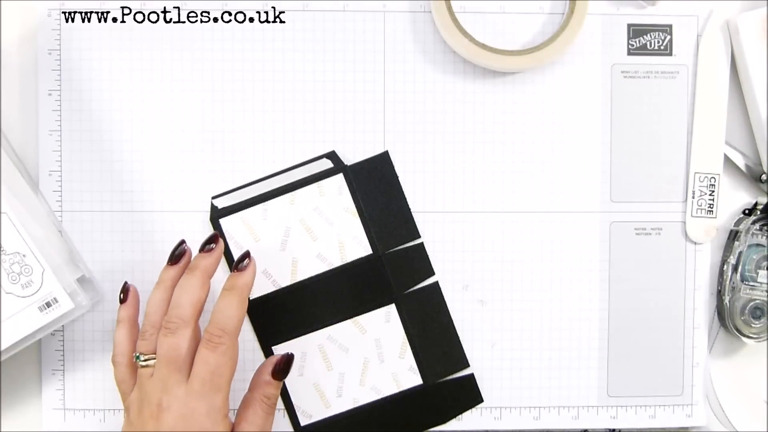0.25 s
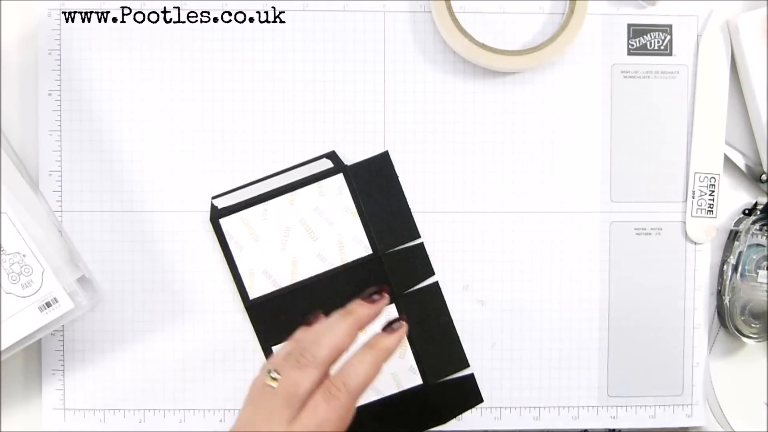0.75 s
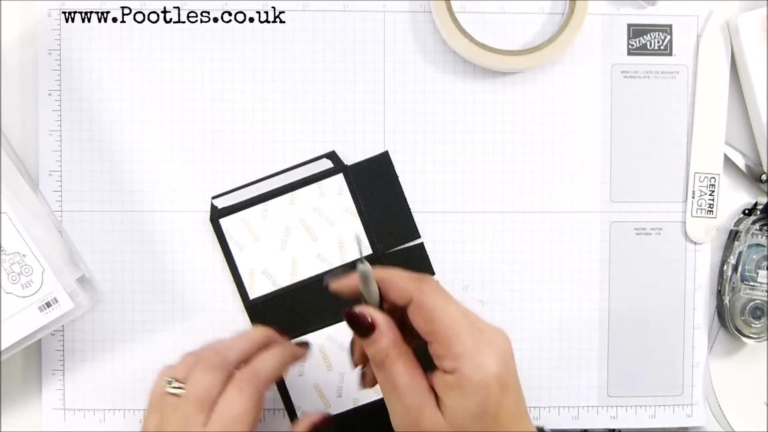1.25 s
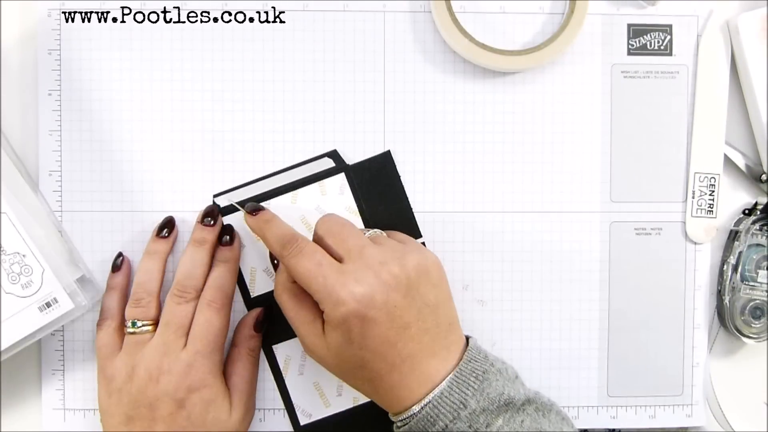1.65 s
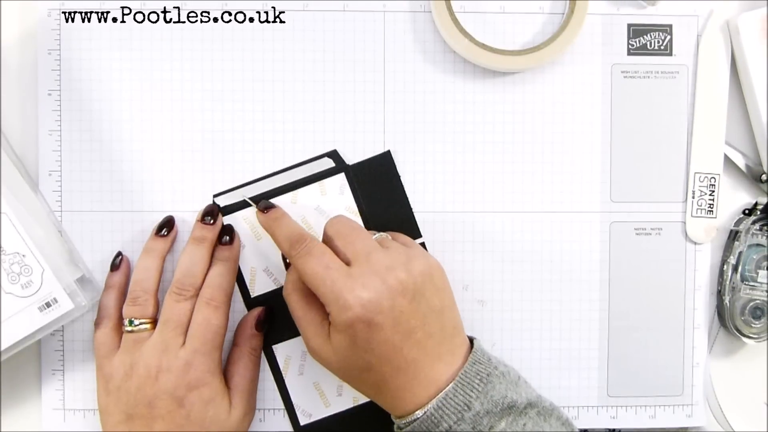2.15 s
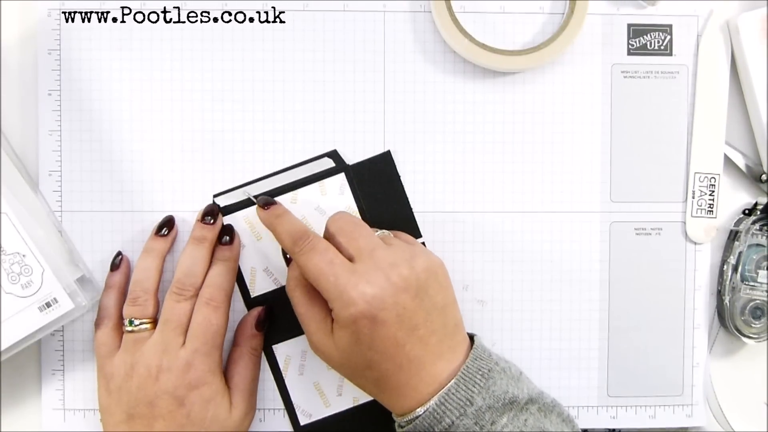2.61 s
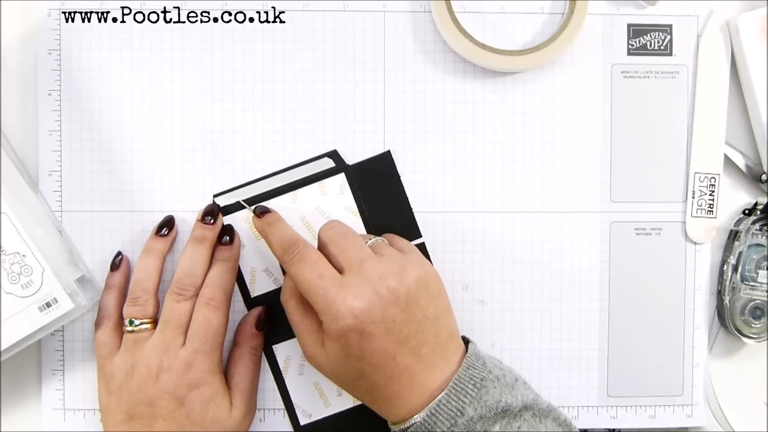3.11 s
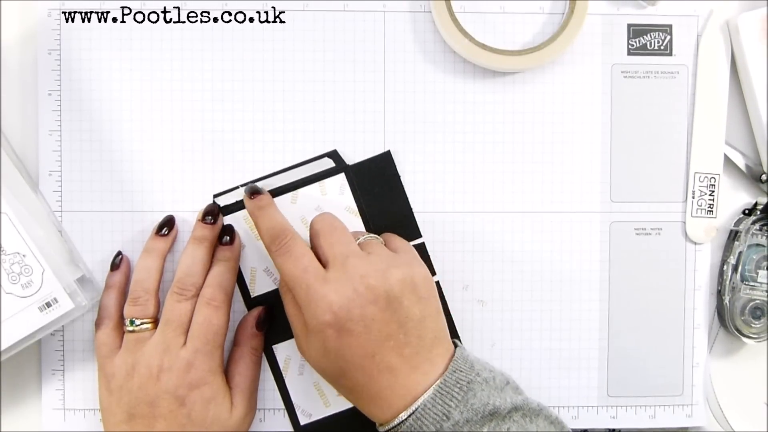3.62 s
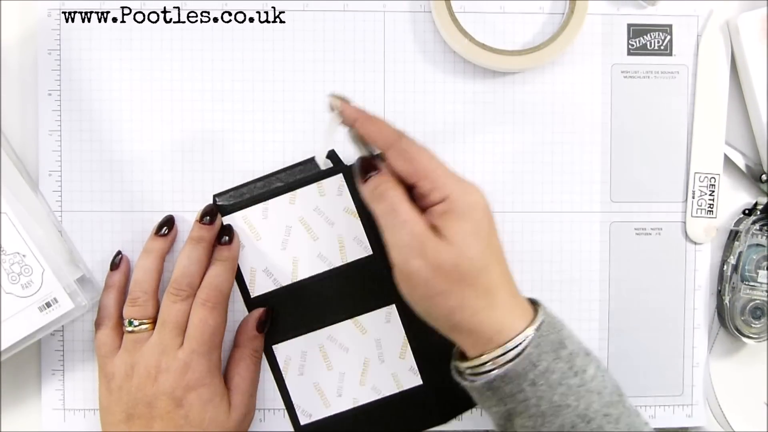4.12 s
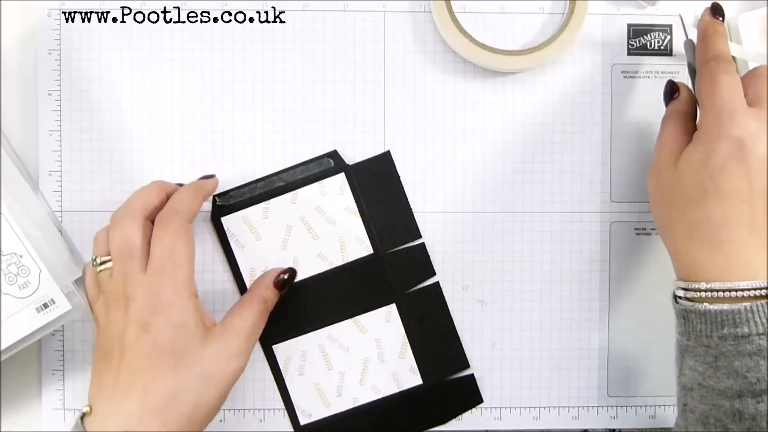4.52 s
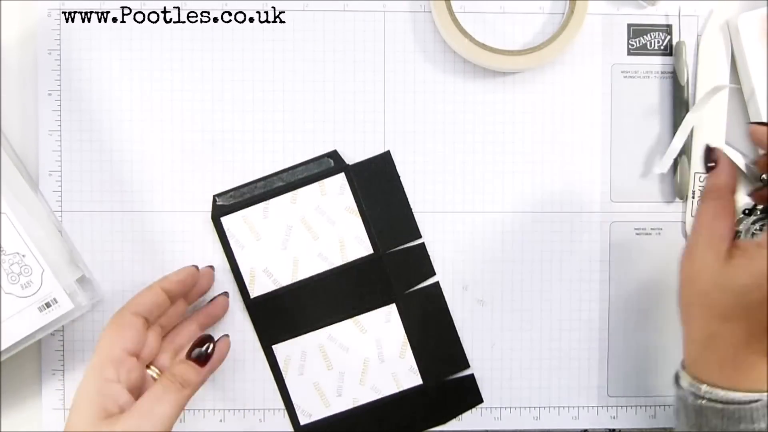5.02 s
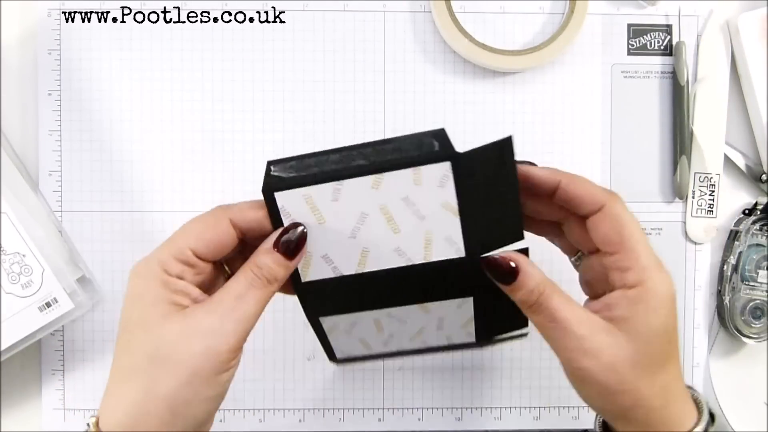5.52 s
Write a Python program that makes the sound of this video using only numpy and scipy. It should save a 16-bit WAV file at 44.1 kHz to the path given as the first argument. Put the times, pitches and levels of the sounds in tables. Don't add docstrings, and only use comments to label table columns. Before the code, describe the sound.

A close stereo microphone hears a craft table in a small, quiet room with soft noise and a very faint steady whine. From 0 to 0.7 s a hollow plastic dispenser knocks, scrapes and shoves about, slightly right; papery hisses whisk by near 0.3 s, knocks gather at 0.37 s, and the loudest clack lands at 0.55 s, with chatter rocking out by about 1 s. From 1 to 3.4 s it is nearly silent: faint fingertip rubs, soft low touches and tiny ticks of a point picking at card, clearest near 2.6 and 3 s. At 3.45 s a thin hiss falls in pitch, then a strip peels in small dry snaps, brightest at 4.15 s. A slim tool drops with a woody clunk at 4.66 s, bounces and rolls briefly. From 5.15 s stiff card slides, with crisp ticks and cracks at 5.3 to 5.45 s, then is lifted, with a last scuff at the end.

```python
import sys
import numpy as np
from scipy import signal
from scipy.io import wavfile

SR = 44100
rng = np.random.default_rng(int(sys.argv[2]) if len(sys.argv) > 2 else 0)


def wrap_up_sound(samples):
    columns = np.atleast_2d(samples).T
    tamed = np.clip(columns, -1, 1)
    steps = np.round(tamed * 32767).astype(np.int16)
    wavfile.write(sys.argv[1], SR, steps)


def gain_from_db(level_db):
    decades = np.asarray(level_db, float) / 20
    return 10 ** decades


N = 253575


def rms_one(x):
    return x / np.sqrt(np.mean(x ** 2) + 1e-20)


def at_hz(points, hz):
    point_hz, level_db = np.array(points).T
    return np.interp(np.log(hz), np.log(point_hz), level_db)


def drift(rate_hz):
    step = 40
    pole = np.exp(-2 * np.pi * rate_hz * step / SR)
    noise = rng.standard_normal(N // step + 2002)
    slow = signal.lfilter([1], [1, -2 * pole, pole * pole], noise)[2000:]
    return np.interp(np.arange(N) / step, np.arange(len(slow)), rms_one(slow))


# frequency in Hz, side minus mid in dB.
NEAR_WIDTH = [(60, -25), (125, -23), (250, -21), (500, -16), (1000, -10), (2000, -6), (4000, -3.5),
              (8000, -.5), (12000, 1)]


def spread(mid, side, hz, width=NEAR_WIDTH):
    side = side * gain_from_db(at_hz(width, hz))
    return np.array([mid + side, mid - side])


def ring(force, hz, t60):
    radius = gain_from_db(-60 / (t60 * SR))
    angle = 2 * np.pi * hz / SR
    zeros = np.sqrt((1 - radius ** 2) / 2) * np.array([1, 0, -1])
    poles = [1, -2 * radius * np.cos(angle), radius ** 2]
    return signal.lfilter(zeros, poles, force + 1e-18)


def blows(rows, chatter_s):
    return [(*row, chatter_s) for row in rows]


def strokes(rows, rise):
    curves = []
    for s, length, db, bright in rows:
        peak_s = s + np.clip(rise, .05, .95) * length
        curves.append([(s, db - 13.5, bright), (peak_s, db, bright), (s + length, db - 22.5, bright)])
    return curves


BRIGHTNESS_TILT = (-2.5, -0.6, 2, 2.5)


def registers(curves, colour_db):
    tilt, colour = np.array(BRIGHTNESS_TILT), np.array(colour_db)
    return [[(s, *(db + colour + bright * tilt)) for s, db, bright in rows] for rows in curves]


def friction(curves, per_s, uneven_db, clump_db):
    grains = (rng.random((2, N)) < per_s / SR) * rng.choice([-1, 1], (2, N))
    grain_size = np.minimum(rng.exponential(1, (2, N)), 4)
    grains = rms_one(grains * gain_from_db(uneven_db * grain_size))
    levels = np.zeros((4, N))
    for rows in curves:
        s, *columns = np.transpose(rows)
        during = np.arange(round(s[0] * SR), min(N, round(s[-1] * SR)))
        levels[:, during] += [gain_from_db(np.interp(during / SR, s, column)) for column in columns]
    together = drift(60)
    clumps = [gain_from_db(clump_db * (.6 * together + .8 * drift(30))) for _ in levels]
    return grains, levels * clumps


REGISTER_EDGES = [200, 1100, 3500]


def struck(modes, hits, curves, boost_db, focus_db, thump_db, tick_db, per_s, uneven_db, clump_db, pan_db):
    grains, levels = friction(curves, per_s, uneven_db, clump_db)
    out, force, modes = np.zeros((2, N)), np.zeros((2, N)), np.array(modes)
    when, peak_db, favoured_hz, body_db, edge_db, chatter_s = np.transpose(hits)
    register = np.searchsorted(REGISTER_EDGES, modes[:, 0])
    after = np.arange(SR // 16) / SR
    span = slice(max(0, round((when.min() - .3) * SR)), round((when.max() + .6) * SR))
    luck_db = rng.standard_normal((len(when), len(modes)))
    chatter = rng.standard_normal((len(when), 2, len(after)))
    chatter *= np.exp(-after / np.clip(chatter_s, 5e-4, .03)[:, None, None])
    for k, (hz, level_db, t60) in enumerate(modes):
        force[:] = 0
        bright = np.clip(np.log(hz / 800) / np.log(4000 / 800), 0, 1)
        register_db = boost_db if register[k] else thump_db
        broad = gain_from_db(body_db + bright * (edge_db - body_db) + register_db)
        near = gain_from_db(peak_db + focus_db - 60 * np.log2(hz / favoured_hz) ** 2)
        blow = np.hypot(broad, near) * np.sqrt(1 + t60 / 0.0087)
        blow *= gain_from_db(luck_db[:, k])
        rattle = np.clip(hz / 2500, .3, 1)
        chatter[:, :, 0] = gain_from_db(tick_db) * np.array([1, .6]) / rattle ** 0.96
        heard = np.sum(ring(chatter[:, 0], hz, t60) ** 2, axis=1) / np.sum(ring(after == 0, hz, t60) ** 2)
        blow *= np.clip(np.sum(chatter[:, 0] ** 2, axis=1) / heard, .1, 10) ** .4
        for s, gain, shape in zip(when, blow, chatter):
            start = round(s * SR)
            force[:, start:start + len(after)] += rattle * gain * shape[:, :N - start]
        same_register = modes[register == register[k], 1]
        share = gain_from_db(level_db) / np.sqrt(np.sum(gain_from_db(2 * same_register)))
        lean_db = pan_db * min(hz / 1200, 1) / 2
        rubbed = ring(grains[:, span] * levels[register[k], span], hz, .45 * t60)
        mid, side = ring(force[:, span], hz, t60) + rubbed
        out[:, span] += (-1) ** k * share * spread(mid, side, hz) * gain_from_db([[lean_db], [-lean_db]])
    return out


# start in seconds, struck spot in
# dB, favoured pitch in Hz, body in dB, edge in dB.
DISPENSER_KNOCKS = [(0.001, -10.5, 361, -42, -37.5), (0.012, -13.5, 326, -67, -41),
                    (0.078, -22, 720, -50, -51), (0.1575, -22, 2480, -42.5, -55),
                    (0.168, -25.5, 1380, -57.5, -59), (0.2095, -28, 2500, -46, -43),
                    (0.214, -21, 800, -51, -64), (0.199, -33, 2410, -45.5, -38.5),
                    (0.243, -29.5, 2200, -55, -57.5), (0.2495, -24.5, 2200, -55, -56.5),
                    (0.262, -32, 2300, -55.5, -58), (0.22, -15, 291.4, -42.5, -71),
                    (0.368, -10.5, 1800, -26.5, -35), (0.371, -9.5, 746, -28, -36.5),
                    (0.376, -19.5, 1000, -38, -43), (0.380, -18.5, 2400, -45, -43),
                    (0.416, -12, 780, -29, -43), (0.423, -18.5, 750, -35, -48),
                    (0.443, -11, 700.5, -42, -62), (0.5452, -1.5, 450, -19, -31),
                    (0.549, -7.5, 1805, -42, -28), (0.551, 0, 680, -38, -34.5),
                    (0.556, -7, 440, -30.5, -33.5), (0.566, -12.5, 600, -37.5, -43.5),
                    (0.579, -14.5, 709, -35, -53), (0.611, -11.5, 487, -60, -54),
                    (0.637, -12.5, 1395, -56, -34.5), (0.6192, -13.5, 1785, -69.5, -37),
                    (0.6242, -33.5, 2196, -33, -37.5), (0.640, -12, 5400, -40, -30.5),
                    (0.6445, -17.5, 1484, -38, -41.5), (0.655, -22, 1505, -34, -42.5),
                    (0.662, -17.5, 664, -24.5, -39), (0.672, -20, 1000, -36, -47),
                    (0.683, -14.5, 800, -54.5, -45),
                    (0.703, -17.5, 1472, -45, -46.5), (0.723, -42, 2210, -64, -46),
                   (0.742, -22, 798, -51, -66), (0.773, -41, 2150, -51, -55), (0.761, -42, 5400, -47, -64),
                   (0.79, -43, 5350, -67, -58), (0.841, -45, 2120, -53, -67), (0.87, -43, 2200, -41, -62),
                   (1.007, -37, 1200, -54.5, -76), (1.036, -27, 330, -52.5, -68.5)]
# start in seconds, struck spot in dB, favoured pitch in Hz,
# body in dB, edge in dB.
EDGE_CRACKS = [(0.150, -8.5, 2403, -35.5, -34), (0.203, -14, 2420, -37.5, -29.5),
               (0.4135, -15, 1846, -32.5, -37), (0.426, -13.5, 2010, -33, -27),
               (0.5458, 9.5, 620, -13.5, -29), (0.609, -18, 3000, -38, -38),
               (0.6345, -22.5, 4100, -34.5, -22), (0.71, -17.5, 2050, -35, -41)]
# time in seconds, pressure in dB,
# speed as brightness in dB per register.
DISPENSER_DRAG = [
    [(0.0, -46.5, -10.5), (.032, -51.5, 3), (.07, -49, 3), (.12, -52.5, 1), (.148, -55, 1.5), (.16, -46, 2),
     (.224, -45.5, 0.5), (.276, -53.5, 6.5), (.334, -59, 2.5), (.362, -70.5, -3)],
    [(.375, -41, -1), (.408, -39, 3.5), (.447, -35, 1.5), (.505, -46.5, 2), (.512, -45, 3), (.54, -48, 6)],
    [(.555, -28, 1.5), (.581, -35, 1.5), (.635, -31, 3), (.699, -37, 1), (.78, -49.5, -2), (.881, -60, -10),
     (.993, -85, -7), (1.041, -61.5, -7), (1.15, -102, 10)],
]
# frequency in Hz, level in dB, 60 dB decay in seconds.
DISPENSER_MODES = [(84, -7.5, 0.54), (154.7, -1.5, 0.14), (288.3, -1, 0.06), (405.5, 2.5, 0.033),
                   (510, 0, 0.04), (702, 0.5, 0.041), (857, 2, 0.03), (1012, 4, 0.018), (1070, -5, 0.012),
                   (1225, -6, 0.048), (1380, -3.5, 0.07), (1499, 5.5, 0.0073), (1610, -2.5, 0.062),
                   (1785, -5, 0.053), (2030, -3, 0.012), (2200, -4, 0.049), (2430, 1, 0.018),
                   (2590, 0, 0.013), (3230, 3, 0.0055), (4040, 9, 0.0023), (4900, 6, 0.006),
                   (4910, 6.5, 0.0074), (5830, 5, 0.0019), (6940, 2, 0.0011), (10330, 4, 0.00056),
                   (13000, -1, 0.00063)]


def dispenser():
    hits = blows(DISPENSER_KNOCKS, chatter_s=.005) + blows(EDGE_CRACKS, chatter_s=.0008)
    dragging = registers(DISPENSER_DRAG, colour_db=(-15, 5, -3, -7))
    return struck(DISPENSER_MODES, hits, dragging, boost_db=5.0, focus_db=-7.0, thump_db=-16.0, tick_db=9.5,
                  per_s=2000, uneven_db=2.0, clump_db=3.5, pan_db=-4.0)


# frequency in Hz, density in dB per Hz.
HUSH_SPECTRUM = [(15, -40), (25, -18), (92, -2.5), (229, -11), (405, -7.5), (607, -13.5), (796, -9.5),
                 (1610, -17.5), (4140, -20.5), (4870, -20), (12200, -25), (14400, -30.5), (16000, -30.5)]
# frequency in Hz, side minus mid in dB.
DIFFUSE_WIDTH = [(60, -8), (110, -29), (200, -4), (380, -6.5), (700, -1), (1290, 3.5), (2380, 3), (4400, 2),
                 (8120, 0.5), (15000, -0.5)]
# frequency in Hz, level in dB.
WHINE_TONES = [(1163, -83.5), (2326, -90)]
# time in seconds, level in dB.
WHINE_LEVEL = [(0, -1.5), (1.75, 7.5), (3.88, 16), (3.95, -6.5), (5.55, -29), (5.62, 10.5)]


def hush(patchy_db):
    out, edges = 0, 25 * 2 ** np.arange(0, 9.6, .5)
    white = rng.standard_normal((2, 2, N))
    for k, (low, high) in enumerate(zip(edges, edges[1:])):
        band_filter = signal.butter(2, [low, high], "band", fs=SR, output="sos")
        mid, side = signal.sosfilt(band_filter, white[k % 2])
        hz = np.sqrt(low * high)
        level_db = at_hz(HUSH_SPECTRUM, hz) + patchy_db * min(1, 300 / hz) * drift(8.6)
        out = out + gain_from_db(level_db) * spread(mid, side, hz, DIFFUSE_WIDTH)
    time = np.arange(N) / SR
    running_db = np.interp(time, *np.transpose(WHINE_LEVEL)) + 2.0 * drift(3.0)
    waver = 1.3 * drift(4.9)
    whine = 0
    for hz, level_db in WHINE_TONES:
        tone = np.sin(2 * np.pi * hz * time + waver * hz / WHINE_TONES[0][0])
        whine = whine + gain_from_db(level_db + running_db) * tone * [[1.6], [-.3]]
    return gain_from_db(-60.5) * rms_one(out) + whine


# time in seconds, peak level in dB.
HAND_LEANS = [(0.006, -36.5), (.91, -58), (1.051, -55), (1.187, -61), (1.482, -54), (1.67, -61.5),
              (2.169, -57), (3.817, -49.5), (4.63, -70), (5.209, -51.5), (5.62, -72), (5.719, -64)]


def leans():
    force, push = np.zeros(N), np.hanning(round(0.015 * SR))
    boom = ring(np.pad(push, (0, SR // 4)), hz=81.4, t60=0.096)
    for s, db in HAND_LEANS:
        force[round(s * SR)] = gain_from_db(db)
    return signal.fftconvolve(force, boom / np.abs(boom).max())[:N]


def sliding_hiss(rows, sharpness):
    s, level_db, hz = np.transpose(rows)
    out, window = np.zeros((2, N)), np.hanning(512)
    for i in range(round(s[0] * SR), round(s[-1] * SR), 256):
        centre = np.interp(i / SR, s, hz)
        t60 = sharpness / centre
        noise = rng.standard_normal((2, len(window)))
        hiss = rms_one(ring(ring(noise, centre, t60), centre, t60))
        gain = gain_from_db(np.interp(i / SR, s, level_db))
        out[:, i:i + len(window)] += gain * window * spread(*hiss, centre)
    return out


# time in seconds, level in dB, centre in Hz.
EDGE_WHISKS = [
    [(.24, -54, 8400), (.27, -53, 8060), (.31, -60, 6850), (.345, -67, 4800)],
    [(.25, -55, 11960), (.3, -53, 11900), (.335, -56, 11000)],
    [(5.2, -56, 4800), (5.235, -60, 4770), (5.26, -64, 4900)],
    [(5.39, -56, 4630), (5.41, -58, 4430), (5.44, -59, 4700)],
    [(3.64, -65, 169), (3.67, -67.5, 200), (3.72, -59, 257), (3.77, -65, 300)],
    [(5.24, -56, 2100), (5.27, -64, 2100), (5.3, -47, 2100)],
    [(.25, -57, 298), (.3, -57, 300), (.335, -65, 295)],
    [(.718, -38.5, 2200), (.738, -64, 2200)],
    [(.162, -39, 1380), (.2, -49, 1320)],
    [(.632, -34, 1550), (.668, -38, 1520)],
    [(.47, -48, 1450), (.505, -40.5, 1450)],
    [(2.268, -64, 2050), (2.295, -60, 1960), (2.32, -79, 1990)],
    [(3.84, -52, 12800), (3.905, -62, 12800), (3.93, -69, 12800), (4.04, -64.5, 13000), (4.15, -63, 12840)],
    [(.838, -54.5, 2210), (.855, -68, 2170), (.872, -59, 2200), (.905, -64, 2200)],
    [(.77, -45, 2200), (.8, -63, 2260)],
]
WHISK_CYCLES = (8, 2.5, 15, 16, 6.1, 17, 9.2, 24, 20, 29, 19, 14, 2.0, 35, 12)


def whisks():
    return sum(sliding_hiss(rows, cycles) for rows, cycles in zip(EDGE_WHISKS, WHISK_CYCLES))


# start in seconds, struck spot in dB, favoured pitch in Hz,
# body in dB, edge in dB.
TIP_PICKS = [(1.136, -64, 278, -61, -64), (1.481, -38.5, 1360, -66.5, -49.5),
             (1.842, -36, 316, -51.5, -56.5), (2.122, -59, 461, -69, -59), (2.161, -32, 1640, -38.5, -50),
             (2.418, -53, 353, -51.5, -53.5), (2.5885, -25.5, 492, -42.5, -46), (2.596, -40, 800, -60, -47),
             (2.827, -44.5, 1600, -52.5, -61), (2.975, -35, 930, -64, -59), (2.977, -29.5, 4020, -52, -55),
             (2.984, -36, 2540, -50.5, -61.5), (2.538, -59, 9070, -75, -60),
             (3.104, -43, 355, -59.5, -59.5)]
# start in seconds, struck spot in dB, favoured pitch in Hz,
# body in dB, edge in dB.
STRIP_PEEL = [(3.452, -52, 277, -83.5, -58.5), (3.504, -37, 12270, -68, -60),
              (3.593, -38, 11440, -83, -65.5), (3.614, -29.5, 12700, -97, -49),
              (3.623, -29.5, 11260, -95.5, -50), (3.709, -42, 660, -57, -69), (3.737, -50, 6600, -72, -58),
              (3.81, -35, 685, -46, -47), (3.839, -35.5, 8100, -49.5, -49),
              (3.855, -38.5, 2080, -93, -39.5), (3.892, -39, 4600, -49.5, -43),
              (3.984, -57, 5030, -63.5, -51), (4.13, -36, 7000, -60, -45.5), (4.1155, -41, 7900, -69, -56),
              (4.154, -21, 6400, -47.5, -33.5), (4.161, -31, 6550, -55, -41), (4.212, -42.5, 890, -50, -51),
              (4.309, -42, 1470, -52, -60), (4.289, -52.5, 4940, -56, -45.5)]
# start in seconds, struck spot in dB,
# favoured pitch in Hz, body in dB, edge in dB.
CARD_FLEX = [(5.138, -36, 8370, -102, -45), (5.163, -37, 5060, -53, -49.5), (5.192, -34, 3030, -72, -68),
             (5.308, -34, 1600, -59, -52), (5.312, -28.5, 2200, -52, -52), (5.325, -51, 2000, -54, -57.5),
             (5.345, -31, 1800, -67, -55.5), (5.352, -29, 1990, -67, -60), (5.359, -41, 1700, -62, -55),
             (5.381, -32.5, 1070, -64, -46), (5.387, -32.5, 1140, -57.5, -55),
             (5.431, -31.5, 1100, -41, -43.5), (5.441, -25.5, 1280, -41, -58),
             (5.446, -34, 1300, -60.5, -56.5), (5.453, -26, 11000, -43, -51),
             (5.638, -31.5, 3000, -56, -75)]
# start in seconds, struck spot in dB, favoured pitch in Hz,
# body in dB, edge in dB.
TIP_SKIDS = [(2.282, -51, 2005, -57.5, -73), (4.462, -42, 1467, -62.5, -61), (5.678, -37.5, 590, -85, -59)]
# start in seconds, struck spot in dB, favoured pitch in Hz,
# body in dB, edge in dB.
CARD_SNAPS = [(5.3035, -16.5, 2100, -58, -50), (5.4135, -26, 1990, -58.5, -54.5),
              (5.4362, -15, 2100, -40, -41.5)]
# start in seconds, length in seconds, pressure in dB,
# brightness in dB per register.
CARD_RUBS = [(.235, .08, -55, 10), (.29, .05, -56, 10), (1.21, 0.23, -69, 5), (1.45, 0.16, -54, 2),
             (1.6, 0.15, -56.5, 0.5), (1.94, 0.11, -64, 4), (2.16, 0.045, -65, 7.5),
             (2.25, 0.14, -60.5, 3.5), (2.59, 0.072, -70.5, 6.5), (2.69, 0.078, -56.5, 2),
             (3.56, 0.35, -64.5, 5.5), (3.64, 0.057, -55.5, -3), (3.83, 0.075, -57.5, 6),
             (3.88, 0.39, -67, 7.5), (4.05, 0.33, -56, 3), (4.43, 0.151, -57, 2), (4.94, 0.16, -63, 4.5),
             (4.15, 0.025, -65, 14.5), (4.26, 0.23, -57.5, 2.5)]
# time in seconds, pressure in dB,
# speed as brightness in dB per register.
CARD_SLIDE = [
    [(5.145, -58, 3.5), (5.201, -48, 5), (5.239, -35.5, 0), (5.279, -49.5, 2.5), (5.305, -44, 5.5),
     (5.33, -52, 4.5), (5.354, -39, 3), (5.422, -64.5, 9), (5.432, -36.5, -3)],
    [(5.445, -38, 5), (5.487, -53, 4.5), (5.565, -76, 6), (5.625, -90, 11), (5.637, -64, 6.5),
     (5.709, -64.5, 3.5), (5.75, -40.5, -2.5)],
]
# frequency in Hz, level in dB, 60 dB decay in seconds.
CARD_MODES = [(78, 1, 0.12), (169.2, 0.5, 0.16), (259, -3.5, 0.112), (393, 0, 0.064), (624, 4.5, 0.015),
              (976, 8.5, 0.0065), (1370, 7, 0.0056), (1665, 7.5, 0.0051), (2100, 5.5, 0.0087),
              (2400, 5, 0.0043), (3300, 2.5, 0.003), (4630, 0, 0.004), (5800, 0.5, 0.001),
              (7550, -0.5, 0.0038), (9840, 4, 0.0007), (11670, 8, 0.00057), (13280, 4, 0.00052),
              (15000, -6.5, 0.0012)]


def card():
    hits = blows(TIP_PICKS, chatter_s=.004) + blows(STRIP_PEEL, chatter_s=.005)
    hits += blows(CARD_FLEX, chatter_s=.0042) + blows(TIP_SKIDS, chatter_s=.012)
    hits += blows(CARD_SNAPS, chatter_s=.0008)
    rubbing = registers(strokes(CARD_RUBS, rise=0.27), colour_db=(-6.5, -3, 0, 1))
    rubbing += registers(CARD_SLIDE, colour_db=(-21, -11.5, -2, -3))
    return struck(CARD_MODES, hits, rubbing, boost_db=3.0, focus_db=-3.5, thump_db=-14.5, tick_db=10.0,
                  per_s=4900, uneven_db=0.5, clump_db=2.0, pan_db=-1.0)


# time in seconds, hiss level in dB, centre in Hz.
STRIP_SLIT = [(3.43, -75.5, 15400), (3.453, -57.5, 14530), (3.485, -90, 13000), (3.53, -58, 10840),
              (3.575, -62.5, 7680), (3.61, -70, 6770)]


def slit():
    return sliding_hiss(STRIP_SLIT, sharpness=4.2)


# start in seconds, struck spot in dB, favoured pitch in Hz,
# body in dB, edge in dB.
TOOL_DROPS = [(4.574, -25, 281, -41, -59), (4.5745, -30.5, 906, -63, -68), (4.619, -27.5, 320, -47, -66),
              (4.651, -46, 400, -43, -46), (4.6603, -15, 372, -22, -31.5), (4.668, -16.5, 518, -33, -33),
              (4.684, -41, 450, -62, -61), (4.694, -28, 650, -41, -58), (4.712, -20, 407, -57, -58),
              (4.722, -23.5, 393, -39, -46), (4.75, -36.5, 400, -57, -70), (4.775, -35, 395, -54, -70),
              (4.883, -43.5, 5800, -61, -49), (4.931, -41.5, 640, -64, -82), (4.94, -29.5, 340, -64, -78.5)]
# start in seconds, length in seconds, pressure in dB,
# brightness in dB per register.
TOOL_ROLL = [(4.572, 0.03, -54, 1), (4.615, 0.041, -49, 0.5), (4.665, 0.14, -46, -10.5),
             (4.915, 0.186, -54, -0.5)]
# frequency in Hz, level in dB, 60 dB decay in seconds.
TOOL_MODES = [(75.7, 0.5, 0.22), (173.6, 0.5, 0.155), (215.8, 1, 0.035), (280, 0, 0.024),
              (338.8, -8.5, 0.01), (413, -4.5, 0.045), (532, -1.5, 0.028), (600, -2, 0.023),
              (694, 0, 0.035), (903, -2, 0.017), (1020, -4, 0.044), (1200, 5.5, 0.0052), (1450, 4, 0.005),
              (2540, -1, 0.0022), (4250, 8, 0.0014), (5550, 6, 0.0014), (8300, 8, 0.0009),
              (11000, 6.5, 0.0027), (13670, 2, 0.0028)]


def tool():
    rolling = registers(strokes(TOOL_ROLL, rise=0.058), colour_db=(-25, 2.5, 0.5, -8))
    return struck(TOOL_MODES, blows(TOOL_DROPS, chatter_s=.003), rolling, boost_db=0.0, focus_db=-1.0,
                  thump_db=-17.5, tick_db=12.5, per_s=760, uneven_db=0.0, clump_db=-2.0, pan_db=-5.0)


def room(x):
    t60, wall_cut_hz = 0.23, 10000
    out, dull = np.zeros((2, N)), np.exp(-2 * np.pi * wall_cut_hz / SR)
    lags = (rng.uniform(.011, .03, size=10) * SR).astype(int)
    for k, lag in enumerate(lags):
        loop, gain, state = x.copy(), gain_from_db(-60 * lag / SR / t60), [0.]
        for i in range(lag, N, lag):
            back, state = signal.lfilter([gain * (1 - dull)], [1, -dull], loop[i - lag:i], zi=state)
            loop[i:i + lag] += back[:N - i]
        out[k % 2] += (loop - x) * (-1) ** (k // 2)
    side = signal.sosfilt(signal.butter(1, 2500, "high", fs=SR, output="sos"), out[1])
    return np.array([out[0] + side, out[0] - side])


def scene():
    table = dispenser() + leans() + whisks() + card() + slit() + tool()
    return table + gain_from_db(-13) * room(table.mean(axis=0)) + hush(patchy_db=4.0)


def roll_off(x):
    return signal.sosfilt(signal.butter(12, 15850, fs=SR, output="sos"), x)


def record(dry):
    low_pass = signal.cheby2(10, 50, 16800, fs=SR, output="sos")
    mix = signal.sosfilt(low_pass, dry)
    return roll_off(mix)


dry = scene()
out = record(dry)
wrap_up_sound(out)
```